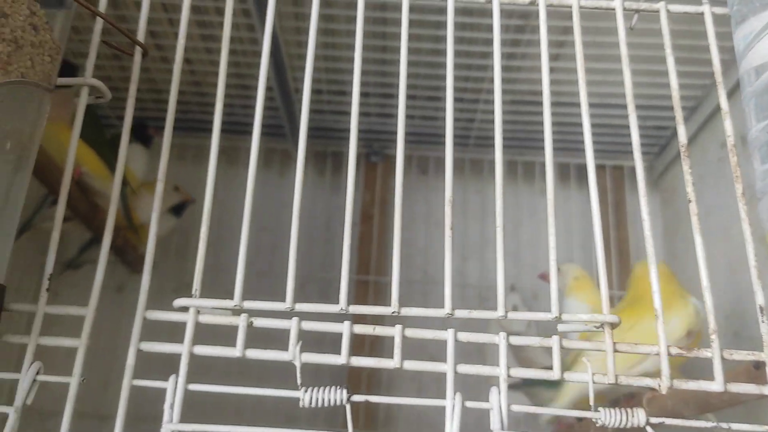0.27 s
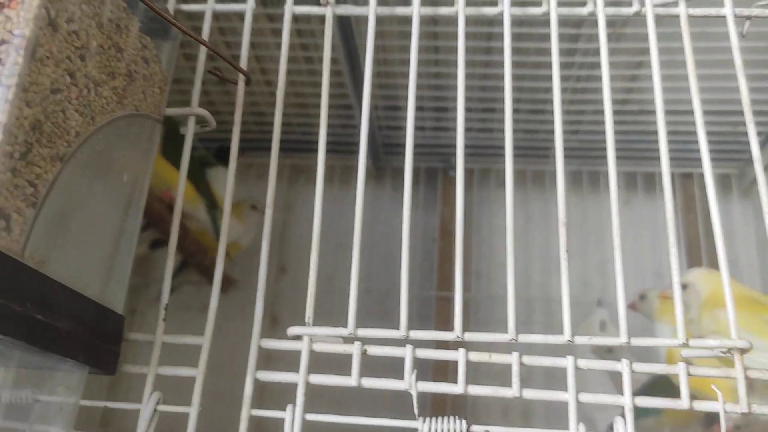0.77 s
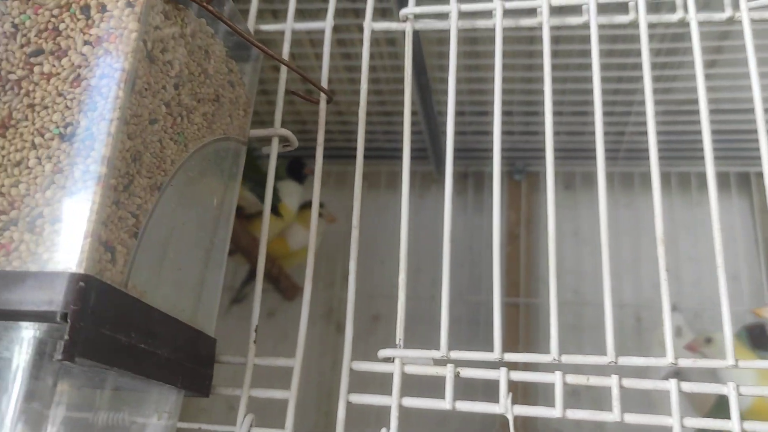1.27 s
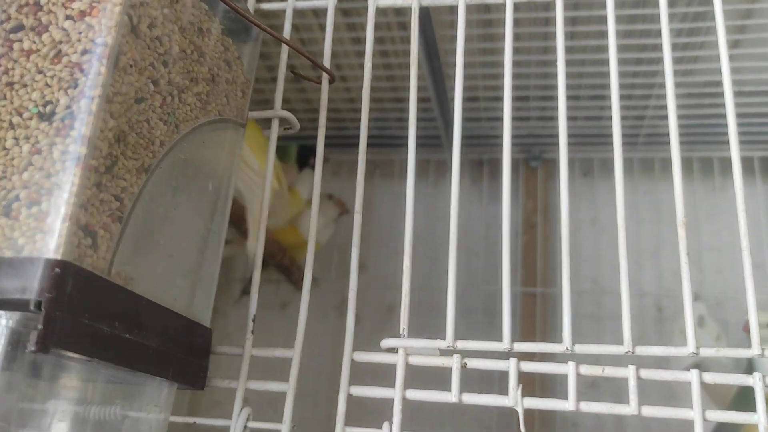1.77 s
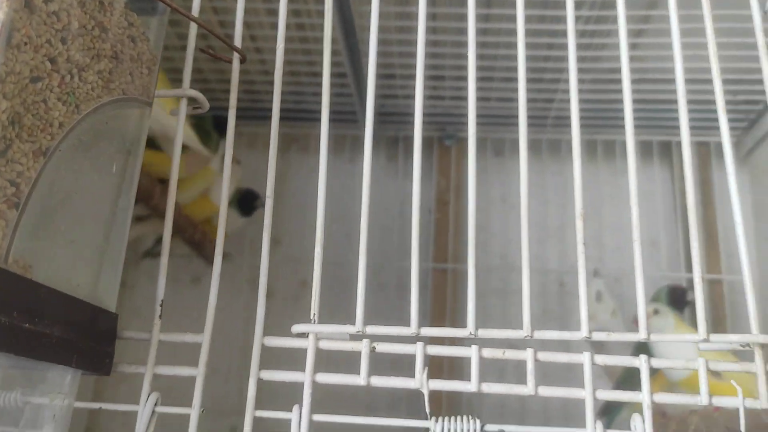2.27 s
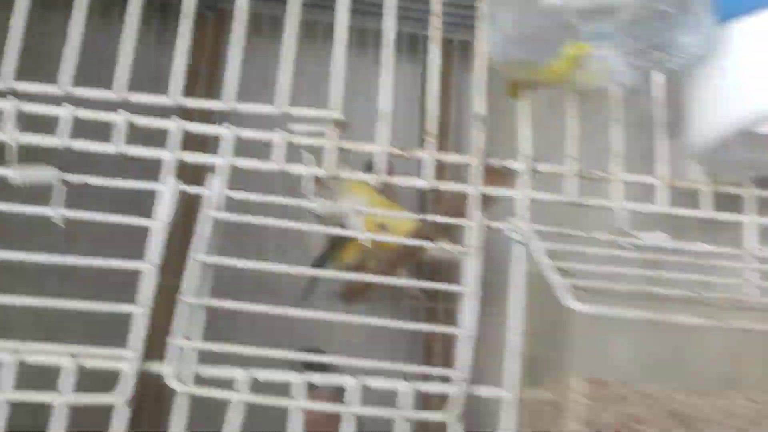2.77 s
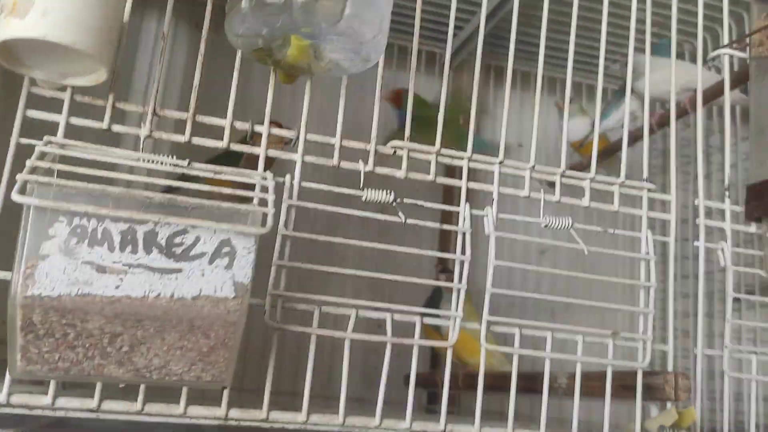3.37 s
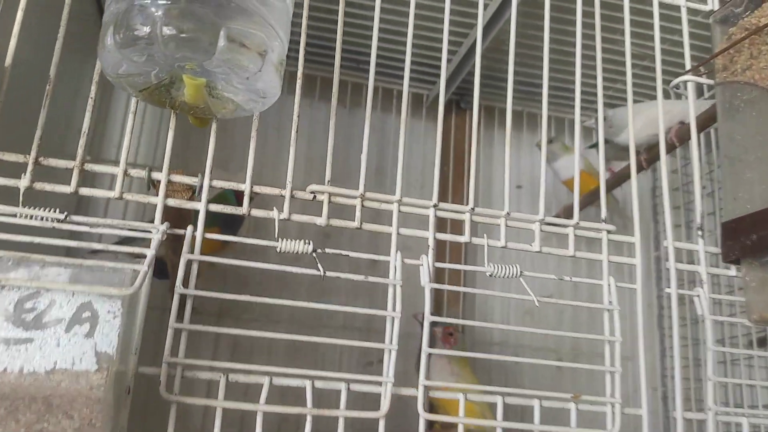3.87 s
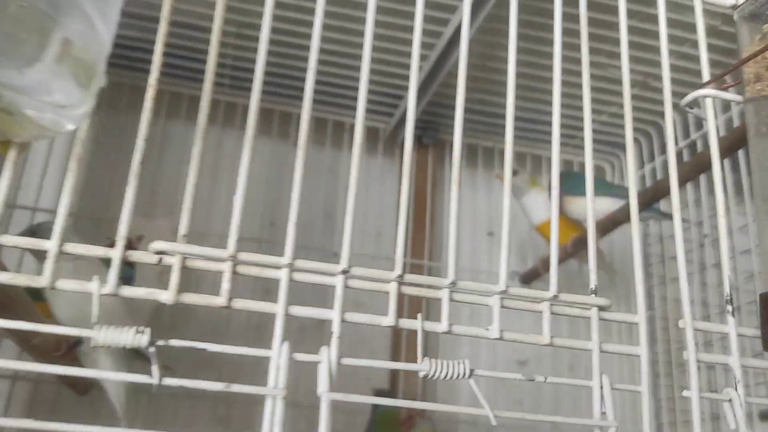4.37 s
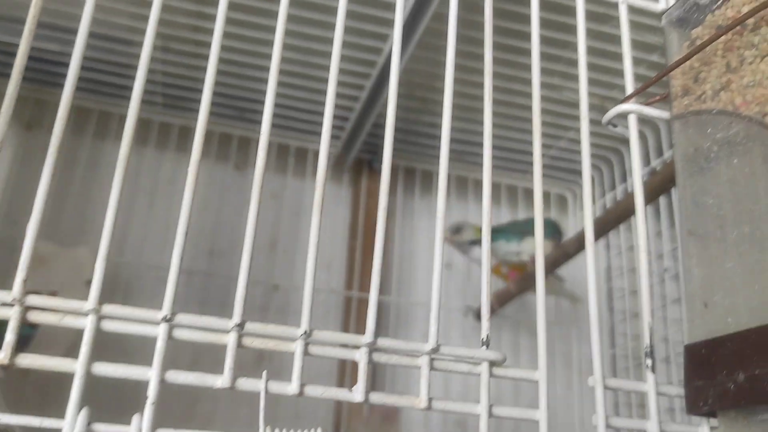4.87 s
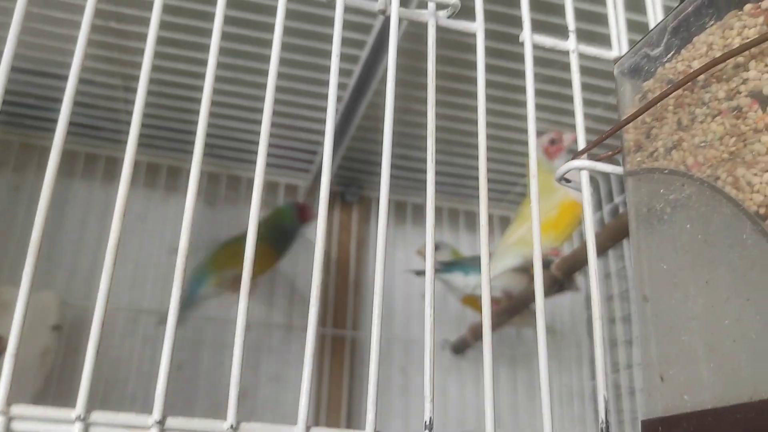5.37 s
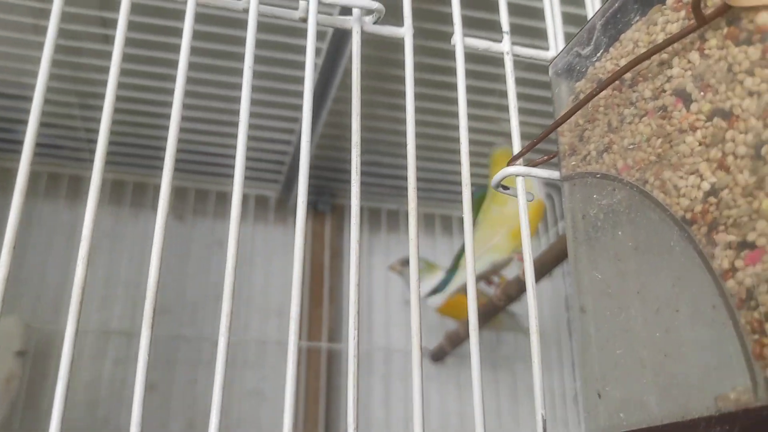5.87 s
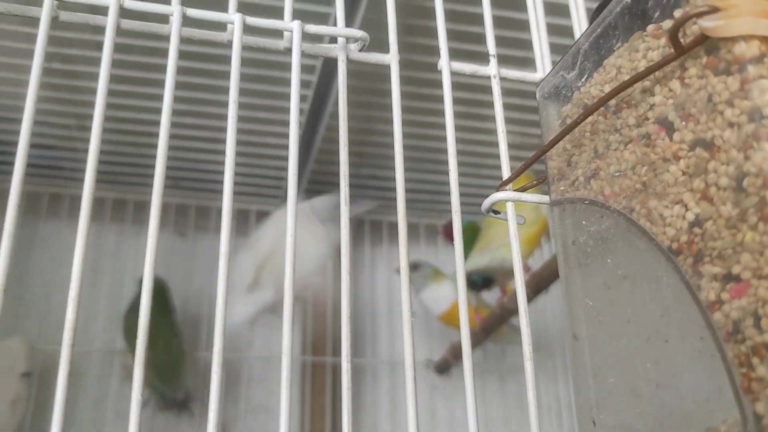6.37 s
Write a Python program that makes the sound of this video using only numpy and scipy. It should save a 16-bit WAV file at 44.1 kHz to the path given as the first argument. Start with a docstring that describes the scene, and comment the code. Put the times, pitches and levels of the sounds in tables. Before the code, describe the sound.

Close to a hand-held microphone in a small room, caged finches give short, high, slightly raspy chirps and three sharp calls while wings rustle and beaks tick on wire. Just after the third call come two handling knocks on the right, the second the loudest sound. Scattered chirps follow, then a flurry of wingbeats and quick taps on bars and perches, with a faint low rumble underneath.

```python
"""Finches in wire cages in a small hard-walled room, close to a hand-held phone. First the birds chatter,
chirp and give two loud calls, each note a vibration of the syrinx, over fluttering wings and taps on
wire and perch. From about 1.8 s beaks tick on wire and fingers knock on the phone's case, hardest near
3 s, just after a third call. Chirps go on, and flutter and taps crowd together after 5 s. Throughout,
the right microphone port is bright and resonant, the left one dull."""
import sys
import numpy as np
from scipy import signal
from scipy.fft import rfft, irfft, next_fast_len
from scipy.io import wavfile
from scipy.ndimage import uniform_filter1d, map_coordinates

SR = 44100
rng = np.random.default_rng(int(sys.argv[2]) if len(sys.argv) > 2 else 0)


def generate_wav(signal):
    """Clip the signal to [-1, 1] and save it as 16-bit WAV at the path in sys.argv[1]."""
    frames = np.transpose(np.atleast_2d(signal))
    scaled = np.clip(frames, -1, 1) * 32767
    pcm = np.round(scaled).astype(np.int16)
    wavfile.write(sys.argv[1], SR, pcm)


N = 292383
ONSET_S, ONSET_DB, FALL_DB = 0.011, 6, 14  # a note's soft start, and its loss at the end


def amp(db):
    """Amplitude ratio of a level in decibels."""
    return 10 ** (np.asarray(db) / 20)


def unit(x):
    """Normalisation to an rms of 1."""
    return x / np.sqrt(np.mean(x ** 2) + 1e-20)


def along(points, hz):
    """Interpolation of (Hz, value) points on a logarithmic frequency axis."""
    f, v = np.transpose(points)
    return np.interp(np.log(hz + 1), np.log(f + 1), v)


def wobble(rate, size=N):
    """Smooth random modulation: a spline through rate knots a second."""
    knots = rng.standard_normal(int(size * rate / SR) + 4)
    return map_coordinates(knots, [np.arange(size) * rate / SR])


def filtered(x, response):
    """Linear filtering: the spectrum of x times a complex frequency response."""
    m = next_fast_len(N + SR // 2)
    return irfft(rfft(x, m) * response(np.fft.rfftfreq(m, 1 / SR)), m)[..., :N]


def room(x, gap_s):
    """Diffuse reverberation: after a gap, each frequency decays exponentially at its own rate."""
    # Each row: frequency in Hz, reverberation time (T60) in seconds.
    decay_times = [(200, 0.24), (2500, 0.31), (4200, 0.25), (7000, 0.23), (14000, 0.12)]
    hz, t, z = signal.stft(rng.standard_normal((2, SR // 2)), SR, nperseg=256)
    tail = signal.istft(z * amp(-60 * t / along(decay_times, hz)[:, None]), SR, nperseg=256)[1]
    tail = np.pad(tail / np.linalg.norm(tail[0]), ((0, 0), (round(gap_s * SR), 0)))
    return signal.fftconvolve(x[None], tail, axes=1)


def chatter(peak_share=0.49, edge_db=12.5, breath_db=-21.5):
    """Biphonation: the two halves of the syrinx sound two steady pitches at once."""
    # Each row: start and length in seconds, upper and lower pitch in Hz, upper and lower level in dB,
    # the lower voice's octave in dB.
    pairs = [(0, 0.017, 4250, 3620, -33, -31.5, -18), (0.023, 0.044, 4340, 3620, -38, -37, -15.5),
             (0.511, 0.016, 4210, 3580, -47.5, -43, -5.5), (0.552, 0.042, 4300, 3450, -37.5, -39, -6),
             (0.596, 0.027, 4340, 3600, -45.5, -44, 2.5), (0.836, 0.021, 4500, 3760, -44.5, -30.5, -25.5)]
    for s, length, upper, lower, upper_db, lower_db, octave in pairs:
        upper_voice, lower_voice = (-5, -19.5, -2), (-4.5, octave, -4.5)  # rasp, octave, room in dB
        for hz, db, voice in (upper, upper_db, upper_voice), (lower, lower_db, lower_voice):
            yield [(s, hz, db - edge_db, *voice),
                   (s + peak_share * length, hz, db, *voice),
                   (s + length, hz, db - edge_db, *voice)], breath_db, 0


def chirps(octave_late_db=10.5, octave_fade_db=15.5, clear_top_db=3):
    """Frequency glide: the pitch climbs, the octave enters late and thins, the rasp eases at the top."""
    # Each row: start, climb and fall-off in seconds; first, top and last pitch in Hz; top level, swell,
    # rasp, octave, room, breath and left port gain in dB.
    glides = [(0.134, 0.054, 0.059, 3547, 4010, 4080, -37.5, 2.5, -7, -25, -1.5, -19, 3.5),
              (.506, 0.021, 0.013, 3006, 4300, 4290, -32, 10, -13, -14, 1, -14, 5.5),
              (0.758, 0.029, 0.0068, 2726, 3020, 3160, -55, 1, -0.5, -5, 0.5, 1.5, 4),
              (2.081, 0.038, 0.021, 3426, 4030, 4120, -38, 8, -7, -6.5, -4, -9, 3),
              (3.629, 0.032, 0.039, 3210, 3940, 4270, -32, 9, -10, -11.5, -7.5, -14.5, 2),
              (3.998, 0.045, 0.013, 3400, 4040, 4180, -35, 3, -5, -32, -7, -15.5, 0.1),
              (4.283, 0.03, 0.009, 5050, 5900, 6000, -59, -2.5, -2, 0, -4, -14, -1),
              (4.419, 0.032, 0.024, 3050, 3740, 3780, -38, 6.5, -6.5, -2.5, -3, -12, 2),
              (4.704, .056, 0.016, 3355, 4263, 4380, -24, 12.5, -11.5, -21, -11, -25, -1),
              (5.005, 0.033, 0.022, 3620, 4160, 4400, -52, 4.5, -7, -6, -4, -14, 1),
              (6.15, 0.04, 0.015, 3130, 3840, 3850, -36.5, 5, -9.5, -13.5, -5.5, -13, 0.1),
              (6.367, 0.055, 0.014, 3440, 4320, 4360, -34, 4.5, -11.5, -7, -6.5, -14, 0.1)]
    for s, climb, fall, low, top, last, db, swell, rasp, octave, wet, breath, left in glides:
        onset = min(0.012, climb / 2)
        yield [(s, low, db - swell - ONSET_DB, rasp, octave - octave_late_db, wet),
               (s + onset, low + (top - low) * onset / climb, db - swell, rasp, octave, wet),
               (s + climb, top, db, rasp - clear_top_db, octave - octave_fade_db, wet),
               (s + climb + fall, last, db - FALL_DB, rasp, octave - octave_fade_db, wet)], breath, left


def loud_calls(lead_s=0.019, lead_hz=3600, leap_hz=5150, drop_hz=4886, breath_db=-33.5):
    """Irregular vibration turns periodic: a low lead-in, a raspy leap, then a held whistle."""
    # Each row: leap start, leap length and hold in seconds; held pitch in Hz; level ending the hold,
    # swell, lead-in level and leap level in dB; fade in seconds; room and left port gain in dB.
    calls = [(0.226, 0.039, 0.019, 4044, -33, -6.5, -46, -38, 0.011, 1, 1.5),
             (0.806, 0.028, 0.036, 4064, -21, 8, -37.5, -37.5, 0.019, -3.5, 0),
             (2.323, .033, .036, 4047, -23.5, 5, -41.5, -39, 0.0026, -3, 0)]
    lead_voice, leap_voice = (-6, -15, 0.92), (-1, -28.5, 0.41)  # rasp, octave, room in dB
    for s, leap, hold, hz, db, swell, lead_db, leap_db, fade, wet, left in calls:
        land, held_voice = s + leap, (-17.5, -35.5, wet)
        yield [(s - lead_s, lead_hz, lead_db - ONSET_DB, *lead_voice),
               (s - lead_s + ONSET_S, lead_hz, lead_db, *lead_voice),
               (s, lead_hz, lead_db, *lead_voice),
               (s + 0.46 * leap, leap_hz, leap_db, *leap_voice),
               (s + 0.67 * leap, drop_hz, leap_db + 2.5, *leap_voice),
               (land, hz, db - swell, *held_voice),
               (land + hold, hz, db, *held_voice),
               (land + hold + fade, hz, db - FALL_DB, *held_voice)], breath_db, left


def peeps(glide_share=0.2, hold_share=0.88, breath_db=-29.5):
    """Sustained oscillation: a short note settles on its pitch, holds and fades."""
    # Each row: start and length in seconds, first and last pitch in Hz, level, rasp, octave, room in dB.
    short_notes = [(0.306, 0.022, 4444, 4030, -33, -23, -32, -8.5),
                   (0.89, 0.014, 4140, 3980, -20.5, -20, -37, -12.5),
                   (0.898, 0.029, 4630, 4680, -42, -5.5, -21.5, -3.5),
                   (1.099, 0.032, 2310, 2335, -61.5, -13, -9, -13),
                   (2.887, 0.087, 4114, 3880, -40.5, -20, -33, -2),
                   (3.614, 0.014, 4550, 4600, -56, -5, -32, -10),
                   (4.45, 0.028, 4620, 4660, -41.5, -1, -37, -7),
                   (4.497, .045, 1370, 1440, -64.5, -24, -38, -9),
                   (4.817, 0.04, 940, 966, -57, -12.5, -33, -6),
                   (5.886, 0.027, 2720, 2474, -50, 0, -24, -11),
                   (6.184, 0.045, 4650, 4590, -49, -2, -28, -7.5)]
    for s, length, first, last, db, *voice in short_notes:
        yield [(s, first, db - ONSET_DB, *voice),
               (s + min(ONSET_S, glide_share * length / 2), first, db, *voice),
               (s + glide_share * length, last, db, *voice),
               (s + hold_share * length, last, db, *voice),
               (s + length, last, db - FALL_DB, *voice)], breath_db, 0


def syrinx(notes, waver_hz=45, scatter_hz=130, jitter_hz=300, throb_db=2.5, flap_hz=900):
    """Modulation: an unsteady membrane shakes a tone into a rasp, and its flapping adds sidebands."""
    out = np.zeros((2, N + SR))
    for contour, breath_db, left_db in notes:
        # Each row: time in seconds, pitch in Hz, level in dB; rasp, octave, room in dB against the tone.
        s, hz, db, rasp_db, octave_db, wet_db = np.transpose(contour)
        t = np.arange(s[0], s[-1], 1 / SR)
        n = len(t)
        rasp = np.minimum(amp(np.interp(t, s, rasp_db)), 1)
        pitch = np.interp(t, s, hz) + (waver_hz + scatter_hz * rasp) * wobble(300.3, n)
        pitch += jitter_hz * rasp ** 5 * wobble(1500, n)
        phase = 2 * np.pi * np.cumsum(pitch) / SR
        fade = np.clip(np.minimum(t - s[0], s[-1] - t) / 0.0025, 0, 1)
        throb = throb_db * wobble(150, n)  # the heard level flutters quickly and irregularly
        shake = 1 + rasp * (0.75 * wobble(1000, n) + 0.27 * wobble(3500, n))
        flap_phase = 2 * np.pi * np.cumsum(flap_hz * (1 + 0.13 * wobble(90, n))) / SR
        shake += 0.66 * rasp * np.sin(flap_phase)
        octave = amp(np.interp(t, s, octave_db))
        tone = shake * (np.sin(phase) + octave * (np.sin(2 * phase) + 0.19 * np.sin(3 * phase)))
        breath_band = signal.butter(2, (2820, 5700), "band", fs=SR)
        breath = unit(signal.lfilter(*breath_band, rng.standard_normal(n)))
        note = fade * amp(np.interp(t, s, db) + throb + 1.5) * (tone + amp(breath_db) * breath)
        # A tiny beak radiates little below its note.
        note = signal.lfilter(*signal.butter(4, 0.49 * hz.min(), "high", fs=SR), note)
        heard = room(amp(np.interp(t, s, wet_db)) * note, gap_s=0.003)
        heard[:, :n] += note
        perch_lag = round(rng.normal(0, 0.0001) * SR)  # birds sit apart, so the left delay varies
        heard[0] = amp(left_db) * np.roll(heard[0], perch_lag)
        out[:, round(s[0] * SR):][:, :heard.shape[1]] += heard
    return out[:, :N]


def rush(spectrum, patchy_db):
    """Partial coherence: patchy stereo noise of rms 1, alike at both ports only in the bass."""
    # Each row: frequency in Hz, left-right correlation.
    correlation = [(60, 0.77), (240, 0.85), (950, 0.031), (3770, -0.067), (15000, -0.52)]
    z = signal.stft(rng.standard_normal((2, N)), nperseg=512)[2]
    patches = uniform_filter1d(rng.standard_normal(z.shape[1:]), size=6, axis=0)
    patches = uniform_filter1d(patches, size=8, axis=1)
    pair = signal.istft(z * amp(patchy_db * unit(patches)), nperseg=512)[1][:, :N]
    turn = lambda hz: np.arccos(np.clip(along(correlation, hz), -1, 1)) / 2
    mid, side = filtered(pair, lambda hz: amp(along(spectrum, hz)) * [np.cos(turn(hz)), np.sin(turn(hz))])
    return unit(np.array([mid + side, mid - side]))


def flock():
    """Broadband noise: wings push air unevenly, feathers and seed rustle, the building rumbles below."""
    # Each row: time in seconds, relative levels of wing air and of rustle in dB.
    stir = [(0.0, -67.5, -61.5), (0.22, -61, -58), (0.35, -56, -55), (0.5, -56, -60), (0.7, -66, -69),
            (1.0, -65, -66.5), (1.301, -64.5, -64), (1.42, -70.5, -65.5), (1.59, -62, -62.5),
            (1.72, -64, -72.5), (1.9, -67, -76), (2.23, -60.5, -63.5), (2.6, -65, -68.5), (2.75, -59, -59),
            (3.19, -50, -59), (3.599, -52.5, -56.5), (3.8, -55.5, -60.5), (3.92, -65, -67),
            (4.25, -60.5, -61), (4.78, -71, -74), (5.1, -56, -63), (5.3, -58, -63.5), (5.43, -54.5, -58),
            (5.6, -53.5, -56), (5.68, -56.5, -64.5), (5.75, -65, -65.5), (6.04, -55, -67.5),
            (6.2, -61.5, -63), (6.63, -61.5, -67.5)]
    # Each row of these spectra: frequency in Hz, relative level in dB.
    wing_spectrum = [(60, -15), (150, -3), (250, -4.5), (500, -6.5), (1000, -7), (1800, -15.5), (3500, -25),
                     (8000, -36.5)]
    rustle_spectrum = [(300, -13.5), (1000, -4), (2500, -2.5), (5000, -9), (9000, -2.5), (11000, -11),
                       (15500, -13.5)]
    rumble_spectrum = [(12, -43.5), (20, 11.5), (129, -3.5), (166, 3), (331, -7), (400, -28.5), (520, -35),
                       (880, -120)]
    s, wing_db, rustle_db = np.transpose(stir)
    t = np.arange(N) / SR
    wings = amp(np.interp(t, s, wing_db) + 1.2 * wobble(35)) * rush(wing_spectrum, patchy_db=3)
    rustle = amp(np.interp(t, s, rustle_db) + 3 + 2.9 * wobble(30)) * rush(rustle_spectrum, patchy_db=3.5)
    rumble = amp(-65 + wobble(0.5)) * rush(rumble_spectrum, patchy_db=1.5)
    return wings + rustle + rumble


def puffs_and_hum(half_length_s=0.011, relative_width=0.22):
    """Narrow-band noise in bell-shaped bursts: soft low puffs of air, and a faint early hum near 550 Hz."""
    # Each row: time in seconds, level in dB, centre frequency in Hz.
    bursts = [(0.332, -50.5, 190), (0.241, -53, 545), (.27, -53, 190), (.3, -52.5, 555), (.36, -51, 557),
              (1.281, -58, 249), (1.62, -54.5, 283), (1.674, -50, 172), (2.354, -47.5, 166),
              (2.435, -56, 149), (2.7, -60, 163), (2.725, -51, 130), (3.13, -45.5, 450),
              (4.149, -51.5, 200), (4.24, -57, 300), (4.687, -61, 180), (4.729, -55, 260), (5.0, -51, 250),
              (5.356, -48, 280), (5.395, -50, 696), (5.432, -44, 650), (5.446, -50, 200), (5.535, -50, 179),
              (5.57, -45.5, 704), (5.58, -49.5, 166), (5.97, -66, 280), (6.061, -58, 280),
              (6.13, -52.5, 273), (5.975, -51.5, 950), (6.04, -56, 930), (6.15, -55, 930),
              (6.56, -53.5, 890), (6.62, -53.5, 895)]
    out, t = np.zeros(N + SR), np.arange(SR // 10) / SR
    bell = np.exp(-((t - t.mean()) / half_length_s) ** 2)
    for s, db, hz in bursts:
        band = signal.lfilter(*signal.iirpeak(hz, 1 / relative_width, fs=SR), rng.standard_normal(len(t)))
        out[round(s * SR) - len(t) // 2:][:len(t)] += amp(db) * unit(band) * bell
    return out[:N]


def taps(t60_s=0.057, tick_t60_s=0.022):
    """Damped impacts: each contact with wire or perch is a tick and a bright burst over a dull thud."""
    # Each row: start in seconds, relative level in dB, relative weight of the thud in dB.
    contacts = [(0.323, -32.5, -6), (1.174, -45, -7), (1.306, -45, -9), (1.48, -41, -31), (1.769, -56, 2),
                (2.141, -37.5, -26), (2.5033, -46.5, -33), (2.6018, -46.5, -12), (2.675, -50.5, 5.5),
                (2.737, -40.5, -1.5), (2.846, -49.5, 7.5), (3.007, -39, -0.5), (3.2, -34, -8),
                (3.9581, -40.5, -10), (4.0081, -32, -9), (4.349, -43, -33), (4.3641, -44, -19),
                (4.6243, -48, -18), (4.6497, -44.5, 4.5), (4.6789, -39.5, 1.5), (4.927, -48, -20),
                (4.9896, -50.5, 4.5), (5.0828, -45, -23), (5.215, -35, -5), (5.2553, -35.5, -10),
                (5.3459, -37.5, -15), (5.387, -38.5, -9), (5.435, -29.5, -9), (5.515, -32, -11),
                (5.5639, -29, -27), (5.82, -38.5, -31), (5.8657, -35.5, -9.5), (5.957, -38.5, -8),
                (6.0053, -39.5, -5), (6.0455, -33.5, -9), (6.091, -58, -16), (6.1383, -51, -25),
                (6.3761, -39, -6), (6.592, -47, -18)]
    out, t = np.zeros((2, N + SR)), np.arange(SR // 8) / SR
    bright = signal.butter(1, [1300, 9000], "band", fs=SR)
    dull = signal.butter(2, [150, 1800], "band", fs=SR)
    swell = amp(-60 * t / t60_s) * (1 - np.exp(-t / 0.0044))
    for s, db, thud_db in contacts:
        hiss = signal.lfilter(*bright, rng.standard_normal(len(t)))
        thud = signal.lfilter(*dull, rng.standard_normal(len(t)))
        tick = amp(-19.5 - 0.22 * thud_db - 60 * t / tick_t60_s)  # the less thud, the sharper the tick
        burst = amp(db - 2) * ((swell + tick) * hiss + swell * amp(thud_db + 13) * thud)
        heard = amp(-8 - 0.17 * db) * room(burst, gap_s=0.0051)  # fainter taps are farther, so wetter
        heard[:, :len(t)] += burst
        out[:, round(s * SR):][:, :heard.shape[1]] += heard
    return out[:, :N]


def finger_knocks(dispersion=0.053, tick_hz=7500, tick_width_hz=3000, room_db=-32):
    """Dispersion: bending waves carry treble fastest, so a knock sweeps down into the case's modes."""
    # Each row: time in seconds, relative level in dB, softness corner in Hz, relative nail tick in dB,
    # left minus right in dB, ratio by which the grip retunes the second mode.
    knocks = [(1.763, -51, 390, -35, 21.5, 0.87), (2.343, -32, 460, -43, 15, 1.17),
              (2.7724, -15, 1450, -1, -21, 0.75), (3.1544, -3.5, 590, -25.5, -22, 1.19),
              (4.137, -39, 318, -38, 20, 1.07), (5.361, -35.5, 1500, -20, 28, 0.75)]
    # Each row: mode frequency in Hz, bandwidth in Hz, gain in dB.
    case_modes = [(169, 33, 4), (325, 187, 8.5), (777, 180, 14.5), (1450, 3500, 5.5)]
    out, bodies = np.zeros((2, N)), np.zeros(N)
    impulse = np.eye(1, N)[0]
    ring = lambda f, hz, width: 1j * f * width / (hz * hz - f * f + 1j * f * width)
    nail = lambda f: ring(f, tick_hz, tick_width_hz) ** 2 / (1 + (f / 9500) ** 6)
    for s, db, soft_hz, tick_db, pan_db, grip in knocks:
        tuned = [(hz * grip, width * grip ** 2, gain) if k == 1 else (hz, width, gain)
                 for k, (hz, width, gain) in enumerate(case_modes)]
        modes = lambda f: sum((-1) ** k * amp(gain) * ring(f, hz, width)
                              for k, (hz, width, gain) in enumerate(tuned))
        travel = lambda f: np.exp(-2j * np.pi * (f * s + 2 * dispersion * np.sqrt(f)))
        body = filtered(impulse, lambda f: modes(f) * travel(f) / (1 + 1j * f / soft_hz) ** 2)
        tick = filtered(impulse, lambda f: nail(f) * travel(f))
        body = amp(db + 2) * body / np.abs(body).max()
        tick = amp(db + 2.5 + tick_db) * tick / np.abs(tick).max()
        out += (body + tick) * amp([[min(pan_db, 0)], [min(-pan_db, 0)]])
        bodies += body
    return out + amp(room_db) * room(bodies, gap_s=0.00299)[:, :N]


def beak_ticks(t60_s=0.012, room_db=-11.5):
    """Free vibration: wire struck by a beak rings very briefly, with a crack of noise."""
    # Each row: start in seconds, level in dB, ring frequency in Hz.
    pecks = [(1.7688, -49.5, 7570), (4.349, -36.5, 7440), (4.622, -49.5, 6800), (5.364, -45, 6600),
             (6.0056, -42, 7640), (6.0475, -39, 6750)]
    out, t = np.zeros((2, N + SR)), np.arange(SR // 20) / SR
    for s, db, hz in pecks:
        crack = np.diff(rng.standard_normal(len(t) + 1))
        tick = amp(db - 60 * t / t60_s) * (np.sin(2 * np.pi * hz * t) + 0.53 * crack)
        heard = amp(room_db) * room(tick, gap_s=0.0029)
        heard[:, :len(t)] += tick
        out[:, round(s * SR):][:, :heard.shape[1]] += heard
    return out[:, :N]


def scene(left_lag_s=0.000354):
    """Superposition: airborne sound is coloured by the two ports; knocks come through the case."""
    # Each row of a port's response: frequency in Hz, gain in dB.
    left_port = [(60, 0), (700, -1.5), (1300, -4), (2500, -6), (4400, -10), (8000, -5.5), (11000, -8),
                 (15000, -10)]
    right_port = [(60, 0.5), (700, 0), (2500, 3.5), (4000, 4), (5500, 3.5), (7600, 12), (9000, 3),
                  (9800, -2), (15000, -7.5)]
    ports = lambda hz: amp([along(left_port, hz), along(right_port, hz)])
    left_late = lambda hz: np.exp(-2j * np.pi * hz * np.array([[left_lag_s], [0]]))
    song = syrinx([*chirps(), *loud_calls(), *chatter(), *peeps()])
    airborne = filtered(song + taps() + beak_ticks() + puffs_and_hum(), left_late) + flock()
    return filtered(airborne, ports) + filtered(finger_knocks(), left_late)


def record(dry, top_hz=15600):
    """Band limiting: the phone keeps nothing above its top frequency."""
    return filtered(dry, lambda hz: hz < top_hz)


dry = scene()
out = record(dry)
generate_wav(out)
```